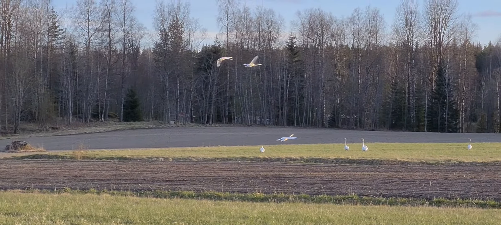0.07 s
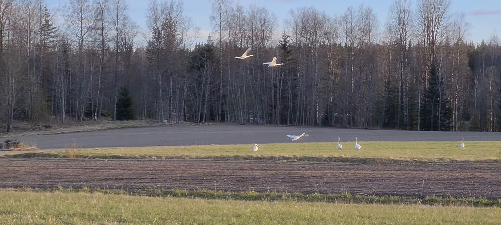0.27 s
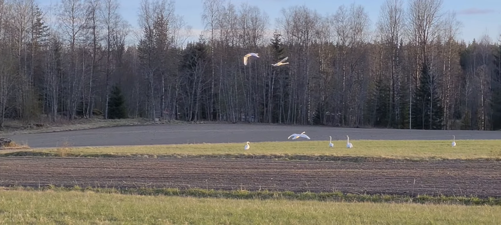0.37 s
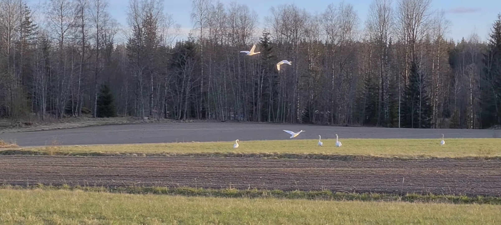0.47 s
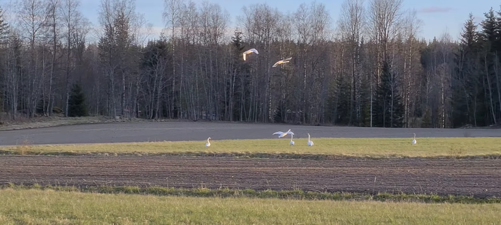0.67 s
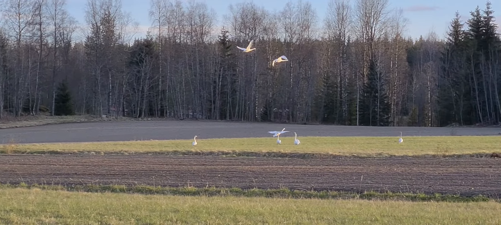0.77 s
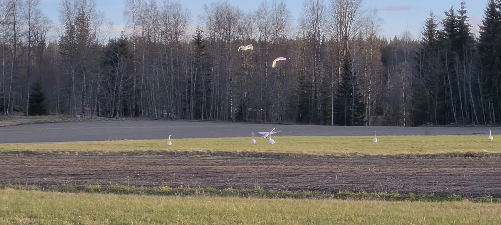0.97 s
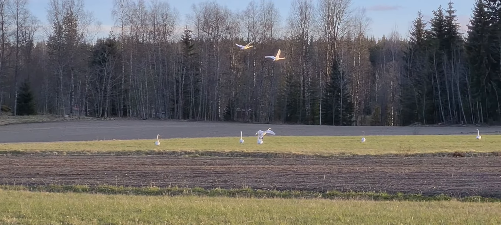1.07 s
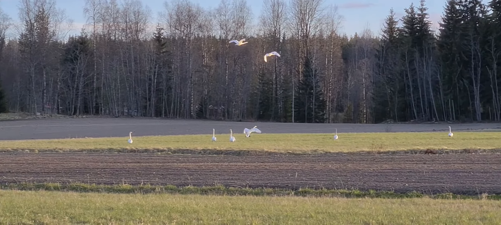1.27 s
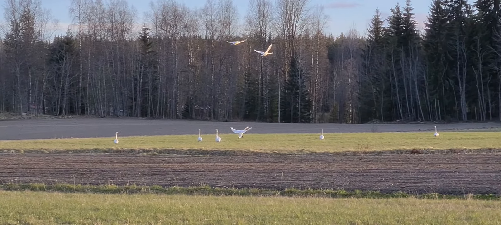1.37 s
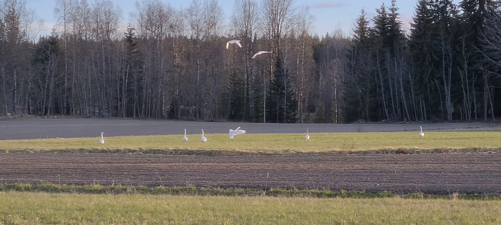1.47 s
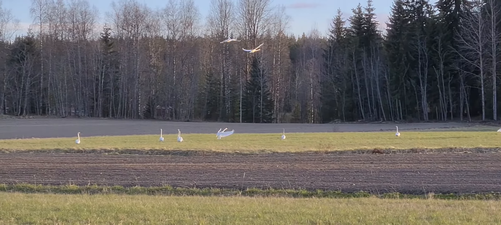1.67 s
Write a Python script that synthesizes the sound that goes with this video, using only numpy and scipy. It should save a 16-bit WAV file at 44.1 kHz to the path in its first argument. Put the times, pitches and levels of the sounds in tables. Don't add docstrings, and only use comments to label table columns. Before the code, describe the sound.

Swans honk in short, overlapping bugled notes across an open field, with low wind buffeting the microphone

```python
import sys
import numpy as np
from scipy import signal
from scipy.fft import rfft, irfft
from scipy.io import wavfile
from scipy.ndimage import uniform_filter1d

SR = 44100
rng = np.random.default_rng(int(sys.argv[2]) if len(sys.argv) > 2 else 0)


def to_wav(sig):
    pcm = np.clip(np.atleast_2d(sig), -1, 1) * 32767
    pcm = np.round(pcm).astype(np.int16)
    wavfile.write(sys.argv[1], SR, pcm.T)


def how_loud(loudness_db):
    steps = np.asarray(loudness_db, float) / 20
    return 10 ** steps


N = 74970


def rms_one(x):
    return x / np.sqrt(np.mean(x ** 2) + 1e-20)


def drift(rate_hz):
    white = rng.standard_normal(N + SR)
    lowpass = signal.butter(2, rate_hz, fs=SR, output="sos")
    settled = signal.sosfilt(lowpass, white[SR - 8000:])[8000:]
    return rms_one(settled)


def coloured(points, alike):
    hz, db = np.transpose(points)
    mid, side = rng.standard_normal((2, N))
    alike = np.clip(alike, -1, 1)
    pair = np.sqrt(1 + alike) * mid + np.sqrt(1 - alike) * side * np.array([[1], [-1]])
    grid_hz = np.fft.rfftfreq(N, 1 / SR) + 1
    gain_db = np.interp(np.log(grid_hz), np.log(np.maximum(hz, 1)), db)
    return rms_one(irfft(rfft(pair) * how_loud(gain_db), N))


def note(row, colour, crest):
    start_s, length_s, pitch_hz, level_db, glide = row
    arch, *overtones_db = colour
    crest_at, sooner = crest
    attack_s, release_s = 0.022, 0.013
    dome_db, brighten = 2.0, 1.3
    t = np.arange(N) / SR - start_s
    u = np.clip(t / length_s, 0, 1)

    sag = arch * (2 * (u - np.clip(crest_at, 0.4, 0.55))) ** 2
    bend = 1 + glide * (u - 0.5) - sag + 0.0022 * drift(27)
    phase = 2 * np.pi * np.cumsum(pitch_hz * bend) / SR

    edge = np.clip(np.minimum(t / attack_s, (length_s - t) / release_s), 0, 1)
    shimmer_db = 1.48 * drift(55)
    shape = np.sin(np.pi / 2 * edge) ** 2 * how_loud(shimmer_db)

    flicker_db = 0.5 * drift(40)
    tones = 0
    for k, tone_db in enumerate((0, *overtones_db)):
        fall_db = dome_db * (2 * (u - crest_at + sooner * k)) ** 2 * (4.0 + brighten * k)
        own_flicker_db = k * np.roll(flicker_db, shift=k * N // 8)
        tones = tones + how_loud(tone_db - fall_db + own_flicker_db) * np.sin((k + 1) * phase + k)

    rasp = 1 + how_loud(-36) * drift(470)
    sound = np.sqrt(2) * how_loud(level_db) * shape * tones * rasp
    break_envelope = shape * how_loud(-36.5 * (u - crest_at) ** 2)
    return phase, break_envelope, sound


def hoarse_air():
    # (centre [Hz], width [Hz], level [dB])
    throat = [(1500, 700, 0.15), (2870, 950, -1.2)]
    air = 0
    for hz, width_hz, db in throat:
        band = signal.butter(3, [hz - width_hz / 2, hz + width_hz / 2], "band", fs=SR, output="sos")
        air = air + how_loud(db) * rms_one(signal.sosfilt(band, rng.standard_normal(N)))
    return air


def swans():
    # (start [s], length [s], pitch [Hz], level [dB], glide [share])
    low_notes = [(0.161, 0.128, 603.2, -64, .01), (0.416, 0.073, 668.6, -47.5, 0.02),
                 (0.66, 0.08, 601, -60.5, 0.02), (0.864, 0.11, 623.6, -53, -0.0051),
                 (1.007, 0.107, 656.7, -47.5, 0.035), (1.079, 0.09, 611, -44, 0.055),
                 (1.276, 0.065, 580, -54, -0.0073), (1.299, 0.089, 675.6, -46, -0.014),
                 (1.321, 0.032, 634.5, -52.5, 0), (1.657, 0.36, 666, -57, .03)]
    # (pitch arch [share], 2nd, 3rd and higher overtones [dB])
    low_colour = [(0.22, 17.5, 8, -15.5, -26.5), (.05, 5.5, -7.5, -20.5, -14.5),
                  (0.18, 11.5, -15.5, -18.5, -22.5), (.01, 12.5, -2.5, -32, -21, -33.5, -19),
                  (.02, -1, -2, -25.5, -20), (.04, 0, -18, -49.5, -18), (.01, 9, 2, -12.5, -45.5),
                  (.03, 5, 0, -19, -27.5), (.01, 11.5, -4.5, -7.5, -21.5), (.03, 5.5, -11, -19, -14, -10)]
    low_crest = [(0.5, 0.048), (0.75, 0.14), (0.37, .01), (0.35, 0.019), (0.55, .01), (0.45, 0.022),
                 (0.58, 0.0081), (.45, .01), (.5, .01), (0.37, .01)]
    # (start [s], length [s], pitch [Hz], level [dB], glide [share])
    high_notes = [(-.02, 0.059, 875, -46, -0.16), (0.047, 0.018, 918, -45.5, -0.052),
                  (0.266, 0.035, 813, -49, -.15), (0.471, 0.054, 865, -45, -0.08),
                  (0.699, 0.08, 864.7, -33.5, 0), (0.749, 0.067, 909.5, -36, -.04),
                  (0.905, 0.12, 866, -53.5, -0.079), (0.954, 0.0454, 825, -47.5, -0.09),
                  (0.98, 0.047, 982, -46, 0.08), (1.146, 0.058, 908.5, -37.5, -0.028),
                  (1.199, 0.13, 865.3, -48, 0), (1.334, 0.13, 969.2, -38.5, -.03),
                  (1.325, 0.077, 782, -44.5, -.05), (1.557, 0.0527, 871, -62.5, 0.17),
                  (0.771, 0.067, 800, -59.5, -0.36), (0.999, 0.042, 1100, -53, .1),
                  (0.231, 0.048, 975, -66, -.01), (1.058, .05, 990, -50.5, .1)]
    # (pitch arch [share], 2nd to 5th overtone [dB])
    high_colour = [(.01, -28.5, -40.5, -34, -55.5), (0.0081, -26, -40.5, -37, -50.5),
                   (0.03, -25, -34, -29, -44), (.01, -8, -12.5, -12.5, -41), (.005, -18, -36.5, -43, -49.5),
                   (.015, -21.5, -40.5, -20.5, -42), (.005, -5.5, -6, -13.5, -16),
                   (.01, -3.5, -1.5, -1.5, -23.5), (.01, -31.5, -33, -32.5, -26.5),
                   (.005, -48, -27, -34, -35.5), (0.038, -7.5, -13, -55, -16.5),
                   (.035, -14.5, -23, -20, -50), (.005, -7.5, -12, -25.5, -54), (0.015, -13, -21, -35, -20),
                   (.01, -24, -22.5, -37, -43.5), (0.016, -27.5, -24, -39, -58),
                   (0.011, -11.5, 0.5, -15, -29.5), (0.012, -34, -31, -15.5, -33)]
    high_crest = [(0.32, -0.037), (.5, .01), (0.38, 0.022), (0.33, .01), (0.41, -0.0026), (0.33, -0.0017),
                  (.4, 0.044), (0.24, -0.052), (.5, -0.015), (0.33, .01), (.45, 0.00025), (0.36, -0.07),
                  (.4, -.03), (.5, .01), (0.26, .01), (0.55, 0.02), (0.72, -0.0062), (0.9, 0.035)]
    breaks = [(1, 3), (2, 4), (3, 6), (6, 10), (7, 12)]
    break_db = [-59, -51.5, -50, -56.5, -58]
    hoarse_db = [-74, -80, -66, -74, -70]
    mixed_multiples = [(1, 1), (-1, 2), (2, 1), (3, 1), (1, 2), (2, 2), (4, -1), (5, -2), (3, -1), (1, 3),
                       (4, 1)]
    mixed_db = [4.5, -1.5, -14.5, -20, -23.5, -11.5, -25.5, 0, -16.5, -19, -19]

    low = [note(*parts) for parts in zip(low_notes, low_colour, low_crest)]
    high = [note(*parts) for parts in zip(high_notes, high_colour, high_crest)]
    out = sum(sound for _, _, sound in low + high)
    air = hoarse_air()
    for (i, j), tones_db, air_db in zip(breaks, break_db, hoarse_db):
        low_phase, low_envelope, _ = low[i]
        high_phase, high_envelope, _ = high[j]
        mixed = 0
        for (a, b), db in zip(mixed_multiples, mixed_db):
            mixed = mixed + how_loud(db) * np.sin(a * low_phase + b * high_phase)
        puffs = air * (1 + 0.3 * np.sin(high_phase - low_phase))
        overlap = np.sqrt(low_envelope * high_envelope)
        out = out + overlap * (np.sqrt(2) * how_loud(tones_db) * mixed + how_loud(air_db) * puffs)
    return out


def across_field(x):
    # (frequency [Hz], density [dB per Hz])
    branches = [(500, -7), (950, -16), (1400, -11.5), (1900, -1), (2400, -36), (3100, 15), (3600, -13.5),
                (4500, 6)]
    near_t60_s, trees_t60_s, trees_delay_s = 0.08, 7.2, 0.025
    pan_db, left_lag_s = -1, 7.5e-5
    t = np.arange(N) / SR
    near = coloured([(500, 0), (5000, 0)], 0.2) * how_loud(-60 * t / near_t60_s)
    onset = np.clip(t / trees_delay_s - 1, 0, 1)
    late = coloured(branches + [(SR / 2, -40)], 0.4) * how_loud(-60 * t / trees_t60_s) * onset
    answer = (how_loud(-14) * rms_one(near) + how_loud(-16) * rms_one(late)) / np.sqrt(N)
    left = np.interp(t - left_lag_s, t, x) * how_loud(pan_db / 2)
    right = x * how_loud(-pan_db / 2)
    return np.array([left, right]) + signal.fftconvolve(x[None], answer, axes=1)[:, :N]


def hanging():
    # (centre [Hz], width [Hz], level [dB])
    remains = [(671, 6.7, -63), (918, 34, -61)]
    t60_s = 3.5
    out = 0
    for hz, width_hz, db in remains:
        band = signal.butter(1, [hz - width_hz / 2, hz + width_hz / 2], "band", fs=SR, output="sos")
        white = rng.standard_normal((3, N))
        out = out + how_loud(db) * rms_one(signal.sosfilt(band, white[:2] + white[2]))
    return out * how_loud(-60 * np.arange(N) / SR / t60_s)


def wind():
    # (time [s], level [dB])
    gusts = [(0, -33), (.1, -36), (.19, -29.5), (0.272, -24), (0.328, -30), (.41, -53), (0.519, -43.5),
             (.58, -32.5), (.7, -33), (.86, -35), (0.929, -41.5), (1.03, -51), (1.1, -39.5), (1.221, -38.5),
             (1.34, -45), (1.44, -37), (1.56, -51), (1.7, -40)]
    # (frequency [Hz], density [dB per Hz])
    rumble = [(8.8, -32.5), (15, -34.5), (54, 3), (74, 1), (171, -10), (251, -37), (291, -48.5),
              (378, -56.5), (500, -37), (650, -70), (1100, -120)]
    # (time [s], left height [full scale], right height [full scale], frequency [Hz])
    buffets = [(0.047, 0.013, 0.03, 85), (0.117, -0.033, 0.022, 111), (0.1466, -0.03, -0.021, 111),
               (0.1865, -0.081, -0.091, 108), (0.227, 0.113, -0.014, 93), (0.2608, -0.16, -0.26, 92),
               (0.289, 0.28, 0.18, 90), (0.314, -0.15, 0.041, 105), (0.3483, -0.057, -0.0012, 114),
               (0.5759, 0.066, 0.011, 100), (0.6169, 0.15, 0.021, 82), (0.6489, -0.023, 0.077, 74),
               (0.6741, 0.045, 0.032, 87), (0.6991, -0.04, 0.0098, 88), (0.732, -0.037, 0.018, 86),
               (0.7583, -0.027, 0.086, 63), (0.7792, -0.087, -0.078, 66), (0.8034, -0.03, 0.012, 89),
               (0.8296, -0.035, -0.05, 91), (0.856, -0.11, -0.031, 79), (0.8976, 0.039, -0.0081, 116),
               (1.2038, -0.091, -0.016, 104), (1.2293, -0.043, 0.026, 45), (1.2526, -0.05, -0.0018, 125),
               (1.3366, 0.066, 0.012, 62), (1.4225, 0.014, 0.074, 91)]
    trim_db, pan_db = 0.5, 3
    lump_db, lump_hz = 2.5, 43
    buffet_cycles = 0.39
    t = np.arange(N) / SR
    gust_s, gust_db = np.transpose(gusts)
    level_db = np.interp(t, gust_s, gust_db) + trim_db + pan_db / 2 * np.array([[1], [-1]])
    lumps = how_loud(lump_db * np.array([drift(lump_hz), drift(lump_hz)]))

    noise = coloured(rumble, 0.2)
    noise = noise / uniform_filter1d(noise ** 2, size=2500) ** (0.23 / 2)
    out = how_loud(level_db) * rms_one(noise * lumps)

    band = signal.butter(4, [104, 271], "band", fs=SR, output="sos")
    eddies = signal.sosfilt(band, rng.standard_normal((3, N)))
    eddies = rms_one((eddies[:2] + 0.56 * eddies[2]) * lumps)
    eddy_db = -6.5 + level_db + (1.46 - 0.5) * (level_db - level_db.max())
    out = out + how_loud(eddy_db) * eddies

    for s, left, right, hz in buffets:
        bell = np.exp(-((t - s) * hz / buffet_cycles) ** 2 / 2)
        push = bell * np.cos(2 * np.pi * hz * (t - s))
        out = out + np.array([[left], [right]]) * push
    return out


def far_flock():
    # (time [s], level [dB])
    swell = [(0, -9), (0.118, -8.5), (0.299, 3), (0.519, 2), (.64, -0.5), (.8, -11.5), (.95, 2), (1.089, 8),
             (1.352, 1.5), (1.502, 0), (1.7, -2)]
    # (frequency [Hz], density [dB per Hz])
    spectrum = [(120, -18.5), (380, -4), (600, -6.5), (950, -20.5), (1400, -7), (2000, -14.5),
                (4600, -27.5), (7000, -38), (9000, -69)]
    swell_db = np.interp(np.arange(N) / SR, *np.transpose(swell))
    return how_loud(-65 + swell_db) * coloured(spectrum, 0.3)


def hiss():
    # (frequency [Hz], density [dB per Hz])
    spectrum = [(2470, -34), (4200, -41), (4830, 5), (6040, 6), (7060, 11), (8260, 4), (9240, 3),
                (10400, 5), (11500, 10), (15600, 9), (16100, -35)]
    level_db = -79 + np.array([[0.1], [2.5]])
    return how_loud(level_db) * coloured(spectrum, 0.02)


def tick():
    start_s, t60_s = 0.3262, 0.012
    t = np.arange(N) / SR - start_s
    burst = rng.standard_normal(N) * (t > 0) * how_loud(-60 * np.maximum(t, 0) / t60_s)
    knock = how_loud(15) * signal.sosfilt(signal.butter(2, 2300, fs=SR, output="sos"), burst)
    click = signal.sosfilt(signal.butter(4, 8500, fs=SR, output="sos"), burst)
    return how_loud(-61) * (click + knock)


def scene():
    return across_field(swans()) + hanging() + wind() + far_flock() + hiss() + tick()


def band_limit(x):
    return signal.sosfilt(signal.butter(12, 16120, fs=SR, output="sos"), x)


def record(dry):
    return band_limit(dry)


dry = scene()
out = record(dry)
to_wav(out)
```